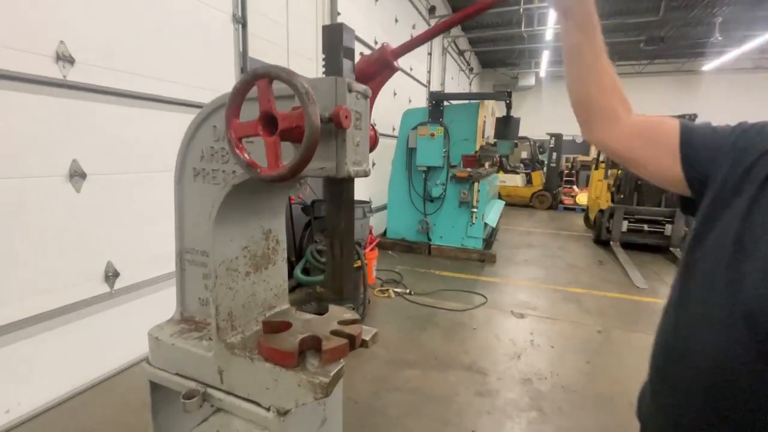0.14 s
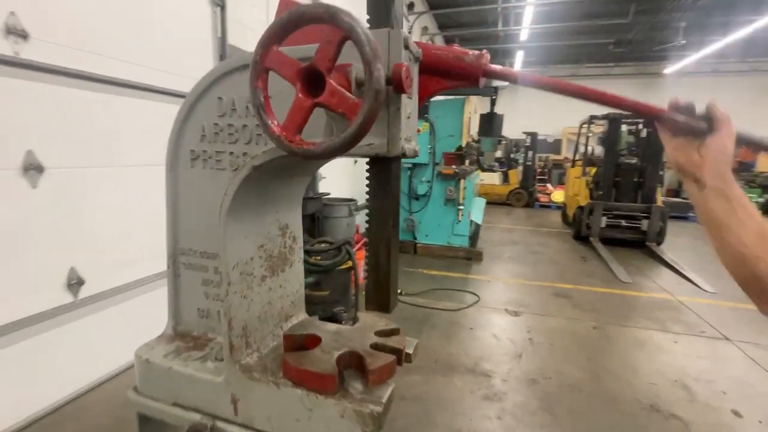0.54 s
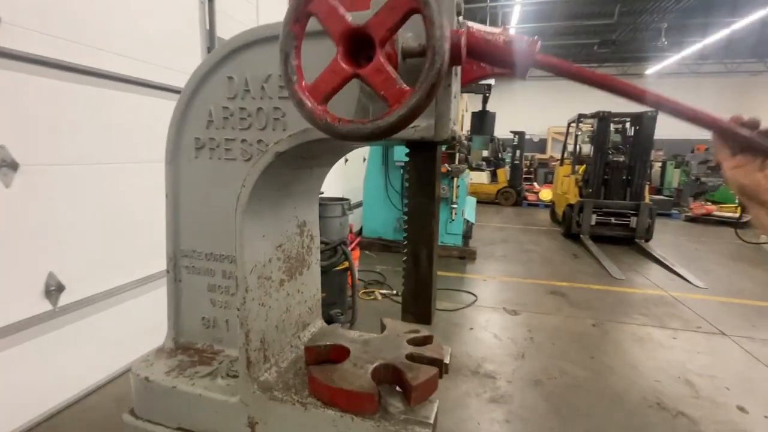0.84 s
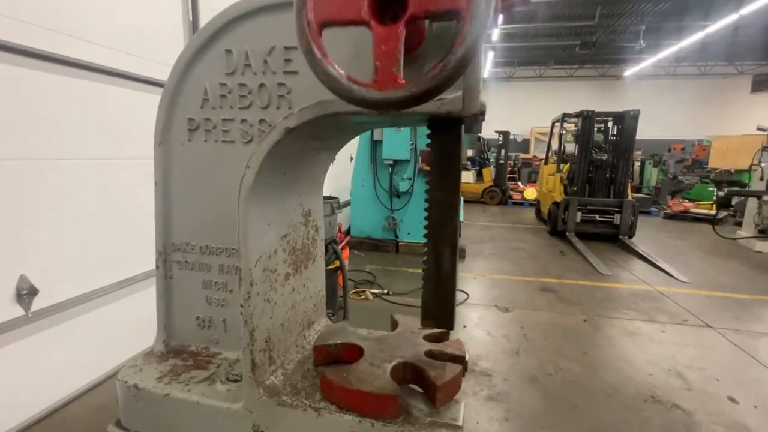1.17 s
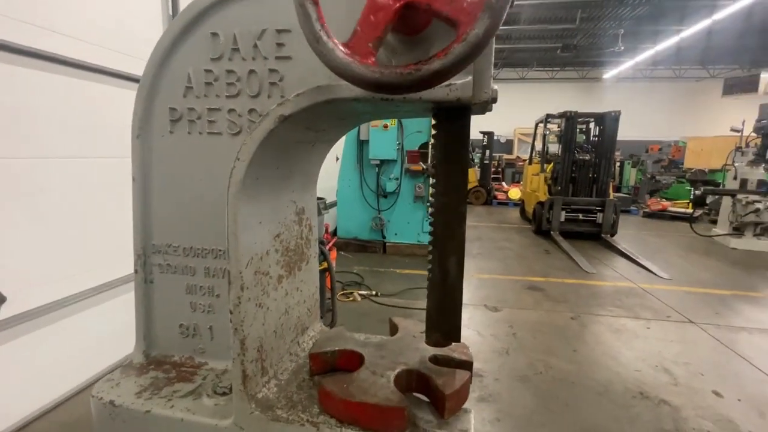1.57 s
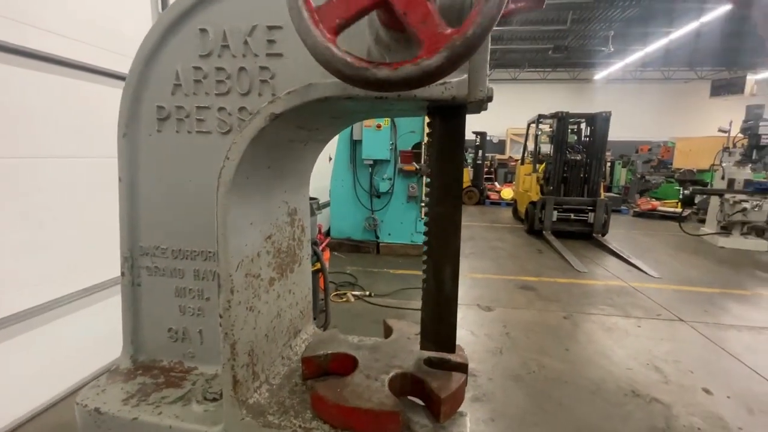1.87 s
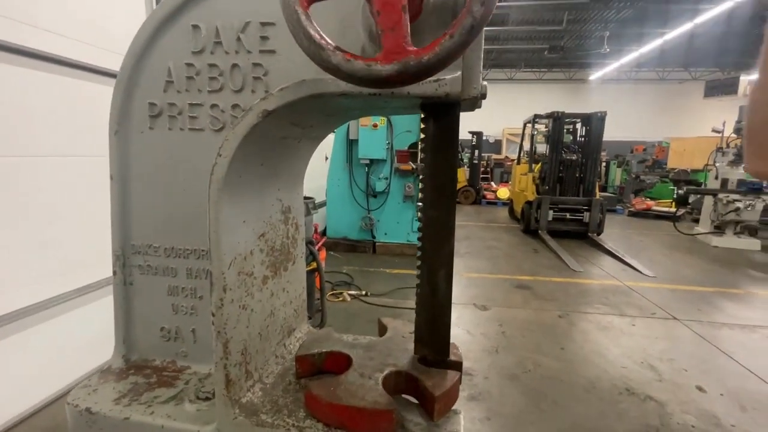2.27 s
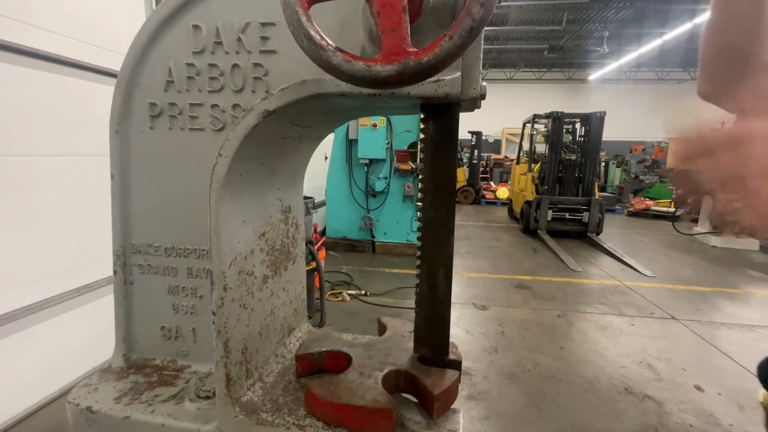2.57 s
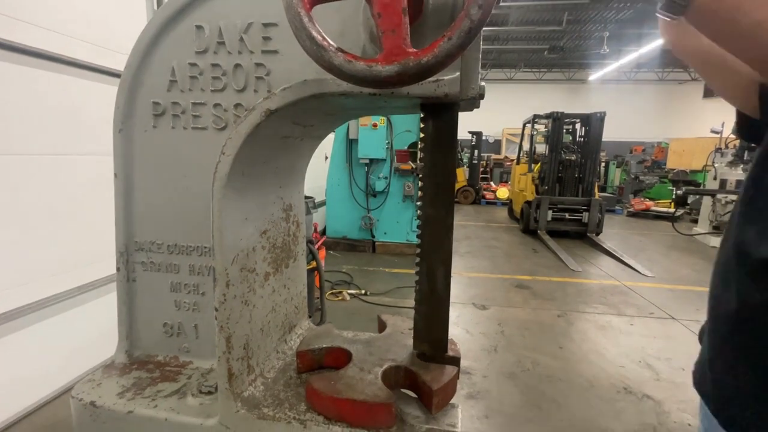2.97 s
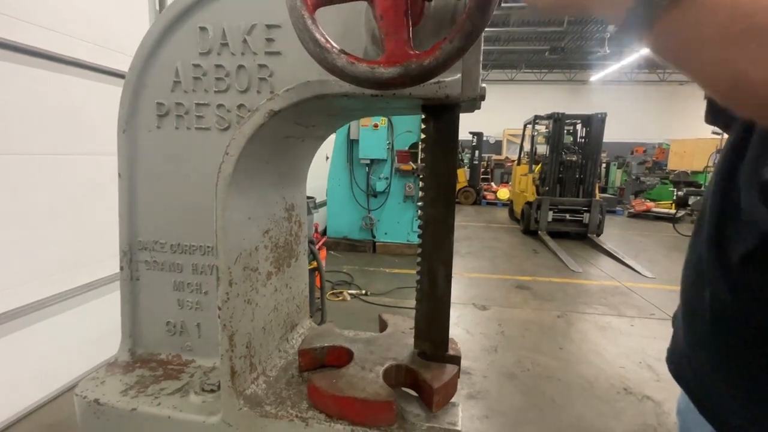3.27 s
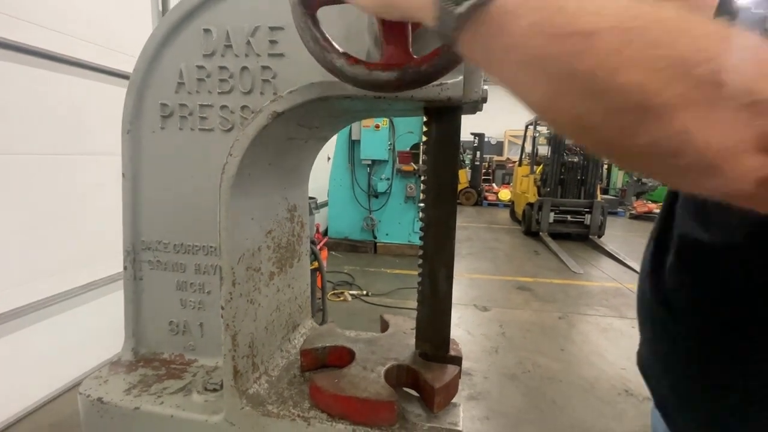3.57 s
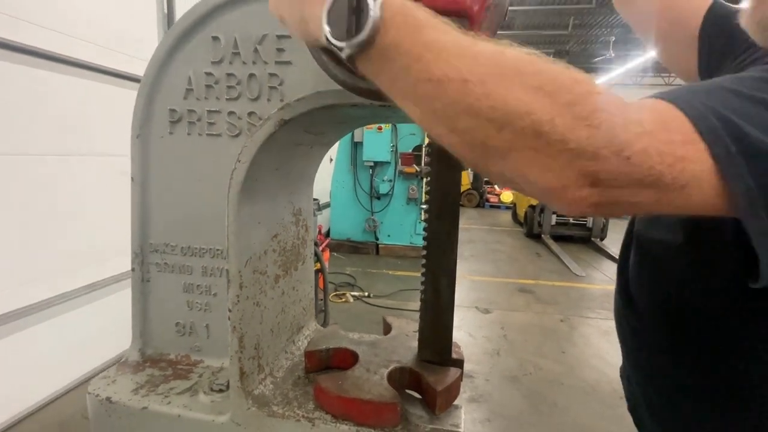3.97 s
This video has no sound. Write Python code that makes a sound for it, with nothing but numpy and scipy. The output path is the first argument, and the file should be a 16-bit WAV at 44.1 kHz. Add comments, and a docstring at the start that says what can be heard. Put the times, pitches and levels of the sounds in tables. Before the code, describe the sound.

A hand-worked cast-iron press clanks sharply in a quick cluster, scrapes, then lands a heavy rattling thunk in an echoing hall with low ventilation rumble.

```python
"""Hand-worked ratchet press

A cast-iron press clanks in a large hall with a concrete floor, over a far ventilation rumble.
Clanks, knocks and clicks are decaying tones (the ringing parts) plus a short burst of noise.
Metal sliding on metal, and one sharp scrape, are gritty filtered noise with a moving level.
Noise that dies away serves as the echo; two close ports hear the press with a phase difference."""
import sys
import numpy as np
from scipy import signal
from scipy.fft import rfft, irfft, next_fast_len
from scipy.io import wavfile
from scipy.ndimage import uniform_filter1d

SR = 44100
rng = np.random.default_rng(int(sys.argv[2]) if len(sys.argv) > 2 else 0)


def inscribe(sig):
    """Save sig as 16-bit PCM at rate SR to the path in sys.argv[1].

    A 1-D sig is mono; a 2-D sig holds one channel per row.
    Samples are clipped to [-1, 1] before scaling.
    """
    pcm = np.round(np.clip(np.atleast_2d(sig).T, -1, 1) * 32767)
    wavfile.write(sys.argv[1], SR, pcm.astype(np.int16))


N = 181318  # length in samples

# Hard metal clanks: t/s, strength/dB, brightness/(dB per octave),
# extra on the frame/dB, on the wheel/dB, on the pawl/dB, ring time factor
CLANKS = [(0.894, -33, -6.5, 1.5, -3.5, 10, 0.55), (1.185, -24.5, -1.43, 4, -3, 6, 0.71),
          (1.244, -22, -0.57, -1, -1.2, 9, 0.84), (1.306, -22, 3, -10.5, -7.4, -1.8, 1),
          (2.144, -33.5, -4.5, -4, -6.5, -39, 0.62), (2.29, -36, -5, -21, -1, -25, 0.84),
          (2.54, -38, -1, 18.5, -3, -40, 0.5), (3.03, -31, 3.5, 7, -10, -10, 0.65),
          (3.451, -16.5, -6.5, 14, 1, -20, 0.39)]
# Dull knocks of the rack in the frame: t/s, strength/dB, brightness/(dB per octave),
# extra on the stand/dB, ring time factor
KNOCKS = [(1.153, -40.5, -3, -1.5, 0.8), (1.326, -25, -1, -7, 0.32), (1.357, -41.5, 5.5, 9, 1),
          (1.484, -34, -0.5, -16, .45), (2.8, -55, -4, -1, 0.59), (3.471, -9, -1.7, -2.5, 0.31),
          (3.519, -16.5, -0.9, -2.5, 0.72), (3.567, -26, -1.5, 9, 0.34), (3.595, -29.5, -2.5, 7.5, 0.61),
          (3.627, -18, -0.36, 2, 0.44), (3.689, -22.5, 0.9, 4.5, 0.38), (3.73, -32.5, 1.7, 6.5, 0.49),
          (3.788, -42.5, -2, 10, 0.9), (4.046, -32.5, -4, -2, 0.78), (4.079, -27, -14, -12, 0.73)]
# Light, damped clicks: t/s, strength/dB, brightness/(dB per octave)
CLICKS = [(.454, -36.5, -2.5), (.688, -34, -5), (2.249, -50, 3), (2.281, -49, 4.8), (2.33, -46, 5),
          (2.342, -31, -.3), (2.349, -48, -.6), (3.444, -22, -2)]
CLICK_RING = 0.15  # ring time factor of every click

# Pitch region of each part of the press, in the order base, stand, frame, ram, lever, hub,
# wheel, rack, gears, pins, pawl, rim: f/Hz
PARTS_HZ = [90, 220, 285, 480, 850, 1350, 1900, 2800, 4200, 6200, 8650, 11000]
STAND, FRAME, WHEEL, PAWL = 1, 2, 6, 10  # places in that order
# How hard a clank, knock or click rings each part, before brightness and extras: level/dB
CLANK_PARTS_DB = [-46, -44, -14, -19, -8, -14, -8.5, -16.5, -17.5, -35, -8, -52]
KNOCK_PARTS_DB = [-14.5, -8, -5, -11, -18, -23, -26, -47.5, -85, -82.5, -64, -50.5]
CLICK_PARTS_DB = [-58, -65, -60, -7, -18, -14, -24.5, -23.5, -28, -34, -48, -29.5]
PIVOT_HZ, KNOCK_PIVOT_HZ = 850, 285  # brightness tilts the parts above this pitch

# Ringing tones (modes) of the press: f/Hz
MODES_HZ = [68, 140, 217, 262, 291, 312, 398, 468, 501, 542, 680, 730, 822, 856, 898, 1016, 1421, 1775,
            1825, 2067, 2234, 2713, 2988, 3537, 3740, 4287, 4970, 8642, 8675, 9545]
# For each mode in turn, before the ring time factor: level/dB, time to fall 60 dB/s
MODES_RING = [(-11, 0.55), (5, 0.13), (-0.5, 0.24), (3, 0.21), (2, 0.14), (-4.5, 0.23), (-5, 0.12),
              (-2.5, 0.095), (-12.5, 0.49), (-8, 0.15), (1, 0.089), (-5.5, 0.22), (6, 0.05), (-3, 0.14),
              (-1, 0.13), (-8.5, 0.16), (-6, 0.074), (-1.7, 0.16), (-5.5, 0.033), (-14, 0.2), (-6.5, 0.078),
              (-1.5, 0.043), (-11.5, 0.058), (-2, 0.07), (3.5, 0.035), (-6, 0.057), (7, 0.062),
              (-9.5, 0.072), (-2.5, 0.055), (-5.5, 0.072)]
# Dense clatter of a blow, before the ring time factor: f/Hz, level/dB, time to fall 60 dB/s
CLATTER = [(205, -23, 0.089), (810, -18, 0.06), (1170, -8.5, 0.08), (1950, -3.5, 0.29), (4300, -6.5, 0.097),
           (5840, -1.5, 0.036), (10300, -4.5, .05), (11200, -9, 0.061), (15500, -47, .02)]

# Smooth slides of metal on metal: start/s, end/s, level before colour tilt/dB
SLIDES = [(.27, 0.78, -69), (2.454, 2.9, -74), (3.247, 4.027, -70), (3.973, 4.29, -62.5)]
SLIDE_RISE_S, SLIDE_FALL_S = 0.2, 0.15
SLIDE_ENDS_DB, SLIDE_TILT_DB = -14, -1  # level at both ends (dB), tilt (dB per octave)
# The sharp scrape at its start, peak and end: t/s
SCRAPE_S = (2.22, 2.345, 2.4)
# The same three moments, before colour tilt: level/dB
SCRAPE_DB = (-54, -37.5, -86)
SCRAPE_TILT_DB = 6.5  # dB per octave
# Colour of a smooth slide, before tilt: f/Hz, relative level per Hz/dB
SMOOTH_COLOUR = [(880, -7), (1500, -1), (3020, 3.5), (3500, 1.5), (4610, -2.5), (6200, -9.5), (8330, -4.5),
                 (12600, -13), (15800, -14)]
# Colour of the sharp scrape, before tilt: f/Hz, relative level per Hz/dB
SHARP_COLOUR = [(900, -42), (1500, 0.5), (2050, 6.5), (2500, -5), (3100, -45.5), (4100, -11), (5260, -37),
                (7900, -26.5), (11500, -31), (13300, -54), (15800, -46)]

# Phase difference of the press between the ports: f/Hz, left leads by/radians
LEAD = [(50, 0.02), (300, 0.25), (950, 1.66), (1720, 1.11), (3500, 4.06), (5000, 5.27), (6400, 2.84),
        (15500, 19.7)]
# Level difference between the ports: f/Hz, left over right/dB
LEAN = [(60, 1.7), (250, 0), (500, 1.5), (1000, 3), (2000, 1), (4500, 5), (8000, -2), (12000, -1)]
# Time the hall's echo takes to fall 60 dB: f/Hz, time/s
HALL = [(200, 0.79), (530, 1.85), (1390, 1.74), (3680, 1.44), (9700, 0.97)]
HALL_DB = -4.5
NEAR_DB, NEAR_T60 = 2, 0.11  # scatter from the floor and machines close by: dB, s to fall 60 dB
# Left-right likeness of diffuse sound: f/Hz, likeness (1 = alike, negative = opposed)
SAME = [(60, 0.99), (180, 0.88), (350, 0.43), (600, 0.19), (1650, -0.21), (5000, 0.096), (8000, 0.81),
        (15000, 1)]
# Colour of the ventilation: f/Hz, relative level per Hz/dB
AIR_COLOUR = [(20, -38), (32, -41), (42, 1), (52, 0.5), (74, -2), (110, -7.5), (227, -14), (365, -17),
              (554, -23), (900, -26.5), (1300, -33.5), (2180, -32.5), (3800, -44), (6300, -55),
              (15800, -66.5)]
AIR_DB = -49  # overall ventilation level
EDGE_HZ = 15760  # the treble is cut above this


def clank(s, strength_db, bright_db, frame_db, wheel_db, pawl_db, ring_time):
    """A hard blow of metal on metal; the extras make frame, wheel or pawl ring more or less."""
    part = np.arange(len(PARTS_HZ))
    extra_db = frame_db * (part == FRAME) + wheel_db * (part == WHEEL) + pawl_db * (part == PAWL)
    return blow(s, strength_db, tilted(CLANK_PARTS_DB, bright_db) + extra_db, ring_time)


def knock(s, strength_db, bright_db, stand_db, ring_time):
    """A soft blow: the higher parts are hardly rung."""
    part = np.arange(len(PARTS_HZ))
    parts_db = tilted(KNOCK_PARTS_DB, bright_db, KNOCK_PIVOT_HZ) + stand_db * (part == STAND)
    return blow(s, strength_db, parts_db, ring_time)


def click(s, strength_db, bright_db):
    """A blow too light to move the heavy parts or free the pawl."""
    return blow(s, strength_db, tilted(CLICK_PARTS_DB, bright_db), CLICK_RING)


def tilted(parts_db, bright_db, pivot_hz=PIVOT_HZ):
    """A harder contact rings the high parts more."""
    octaves = np.log2(np.maximum(PARTS_HZ, pivot_hz) / pivot_hz)
    return np.array(parts_db) + bright_db * octaves


def blow(s, strength_db, parts_db, ring_time):
    """One blow starts all modes together and adds a noisy burst with a tick at first contact."""
    t = np.arange(SR // 3) / SR
    colour = np.transpose([PARTS_HZ, parts_db])
    ring_time = max(ring_time, 0.05)
    ring = ringing(t, colour, ring_time)
    return s, amp(strength_db) * (amp(-1.5) * ring + amp(-5.5) * clatter(t, colour, ring_time))


def ringing(t, colour, ring_time):
    """Each mode is a slightly wavering sine that swells, then dies away at its own rate."""
    hz = np.array(MODES_HZ)[:, None]
    db, t60 = np.transpose(MODES_RING)[:, :, None]
    chance_db = 1.2 * rng.standard_normal(hz.shape)
    side = (-1) ** np.arange(len(hz))[:, None]  # every other mode starts the opposite way
    rise = 1 - np.exp(-t * hz / 1.34)  # low modes swell more slowly
    # loose parts shift while they ring, so each pitch wavers by a small share
    steps = rng.standard_normal((len(hz), len(t) // 100 + 1))
    steps = evened(uniform_filter1d(steps, size=4, axis=1))
    waver = np.repeat(steps, 100, axis=1)[:, :len(t)]
    turns = np.cumsum(hz * (1 + 0.0022 * waver), axis=1) / SR
    level_db = db + chance_db + read(colour, hz) - 60 * t / (t60 * ring_time)
    return (side * amp(level_db) * rise * np.sin(2 * np.pi * turns)).sum(0)


def clatter(t, colour, ring_time):
    """Many tiny contacts sound like noise that dies at a different speed at each pitch."""
    broad = np.delete(colour, PAWL, axis=0)  # the pawl only rings, it adds no clatter

    def burst_db(hz, u):
        t60 = read(CLATTER, hz, order=2) * ring_time
        return read(CLATTER, hz) + read(broad, hz) - 60 * u / t60

    noise = diffuse(count=len(t), size=128, level_db=burst_db)[0]
    tick = 4.0 * np.exp(-t / 0.0025)  # first contact of the two faces
    return noise * (1 - np.exp(-t / 0.0001)) * (1 + tick)


def slide(start, end, level_db):
    """A stroke of smooth friction noise rises, holds its level and falls."""
    risen = start + SLIDE_RISE_S
    s = [start, risen, max(end - SLIDE_FALL_S, risen), end]
    db = level_db + SLIDE_ENDS_DB * np.array([1, 0, 0, 1])
    return rub(s, db, SLIDE_TILT_DB, SMOOTH_COLOUR, grit_db=1.5)


def scrape():
    """One sharp scrape of rough friction noise swells and lets go."""
    return rub(SCRAPE_S, SCRAPE_DB, SCRAPE_TILT_DB, SHARP_COLOUR, grit_db=6.5)


def rub(s, db, tilt_db, colour, grit_db):
    """Gritty friction noise; its level passes through db at the times s."""
    t = np.arange(s[0], s[-1], 1 / SR)
    hz = np.fft.rfftfreq(len(t), 1 / SR)
    # grit: the loudness jitters quickly and at random
    jitter = evened(uniform_filter1d(rng.standard_normal(len(t)), size=90))
    rough = rng.standard_normal(len(t)) * amp(grit_db * jitter)
    noise = evened(irfft(rfft(rough) * amp(read(colour, hz)), len(t)))
    tilt = amp(tilt_db * np.log2(np.maximum(hz, PIVOT_HZ) / 8000))
    fade = np.clip(np.minimum(t - s[0], s[-1] - t) / 0.025, 0, 1)
    return s[0], fade * amp(np.interp(t, s, db)) * irfft(rfft(noise) * tilt, len(t))


def ports(x):
    """The two ports hear the press with a phase difference that depends on pitch."""
    size = next_fast_len(N + SR)
    hz = np.fft.rfftfreq(size, 1 / SR)
    half = np.exp(0.5j * read(LEAD, hz))  # half the lead forward on the left, half back on the right
    return irfft(rfft(x, size) * np.array([half, 1 / half]), size)[:, :N]


def hall(x):
    """Quick dense scatter from nearby surfaces, then a diffuse tail with its own decay at each pitch."""
    t = np.arange(3 * SR // 2) / SR
    tail = diffuse(count=len(t), size=512, level_db=lambda hz, u: -60 * u / read(HALL, hz))
    tail *= np.clip((t - 0.008) / 0.0053, 0, 1)
    near = diffuse(count=len(t), size=512, level_db=lambda hz, u: 0 * hz + 0 * u)
    near *= amp(-60 * t / NEAR_T60) * np.clip((t - 0.003) / 0.007, 0, 1)
    tail = amp(HALL_DB) * tail / np.linalg.norm(tail[0])
    near = amp(NEAR_DB) * near / np.linalg.norm(near[0])
    return signal.fftconvolve(x[None], tail + near, axes=1)[:, :N]


def ventilation():
    """Steady distant rumble and hiss: noise with a fixed colour."""
    noise = diffuse(count=N, size=8192, level_db=lambda hz, t: read(AIR_COLOUR, hz) + 0 * t)
    return amp(AIR_DB) * evened(noise)


def diffuse(count, size, level_db):
    """Two channels of noise, alike as far as SAME tells; level_db(hz, t) shapes it."""
    hop = size // 4
    frames = count * 4 // size + 5
    hz = np.fft.rfftfreq(size, 1 / SR)[:, None]
    a, b, c, d = rng.standard_normal((frames, len(hz), 4)).T
    same = np.clip(read(SAME, hz), -1, 1)
    left, other = a + 1j * b, c + 1j * d
    spectra = np.array([left, same * left + np.sqrt(1 - same ** 2) * other])
    spectra *= amp(level_db(hz, np.arange(frames) * hop / SR))
    return signal.istft(spectra, nperseg=size, noverlap=size - hop)[1][:, :count]


def amp(db):
    """Turns dB into a factor to multiply by."""
    return 10 ** (np.asarray(db) / 20)


def evened(x):
    """Scales to an average strength (rms) of 1."""
    return x / np.sqrt(np.mean(x ** 2) + 1e-20)


def read(points, hz, order=1):
    """Reads one column of a table between its points, on a log-frequency axis."""
    table = np.transpose(points)
    return np.interp(np.log(hz + 1), np.log(table[0] + 1), table[order])


def add(mix, s, sound):
    """Mixes a sound in at s seconds."""
    part = mix[round(s * SR):][:len(sound)]
    part += sound[:len(part)]


def scene():
    """The press, its echoes and the air of the hall."""
    press = np.zeros(N)
    for source, rows in (clank, CLANKS), (knock, KNOCKS), (click, CLICKS), (slide, SLIDES):
        for row in rows:
            add(press, *source(*row))
    add(press, *scrape())
    return ports(press) + hall(press) + ventilation()


def record(dry):
    """The left port is louder at most pitches and the right at some; then the top treble is cut."""
    size = next_fast_len(N + SR)
    left = amp(read(LEAN, np.fft.rfftfreq(size, 1 / SR)) / 2)  # half the difference on each side
    leaning = irfft(rfft(dry, size) * np.array([left, 1 / left]), size)[:, :N]
    lowpass = signal.firwin(511, EDGE_HZ, window=("kaiser", 9), fs=SR)
    return signal.oaconvolve(leaning, lowpass[None], "same")


dry = scene()
out = record(dry)
inscribe(out)
```